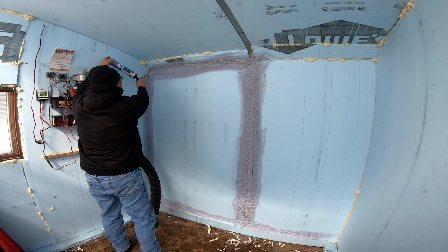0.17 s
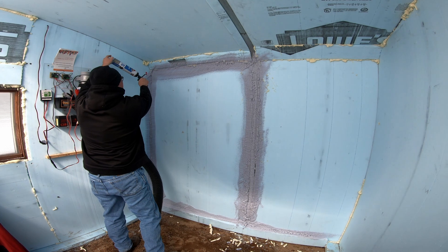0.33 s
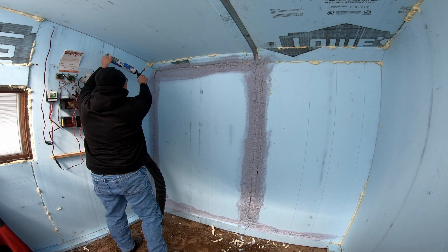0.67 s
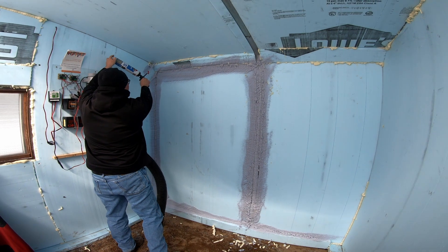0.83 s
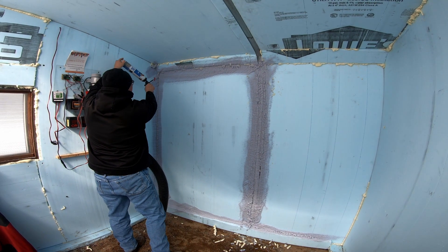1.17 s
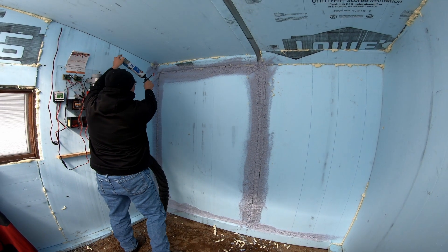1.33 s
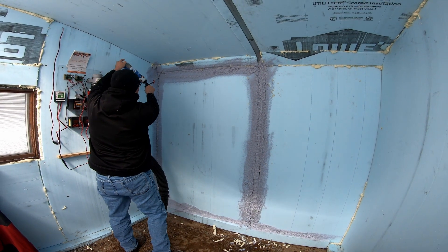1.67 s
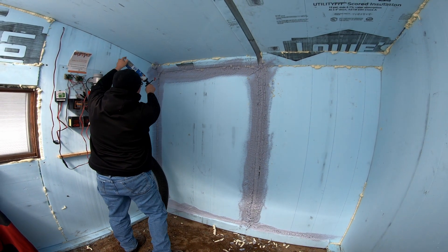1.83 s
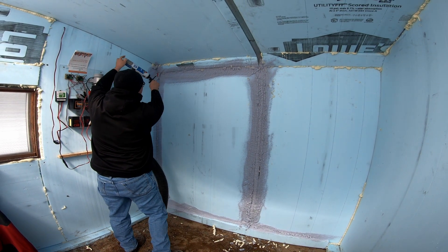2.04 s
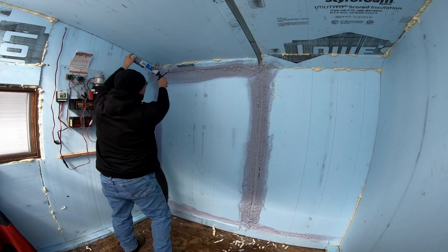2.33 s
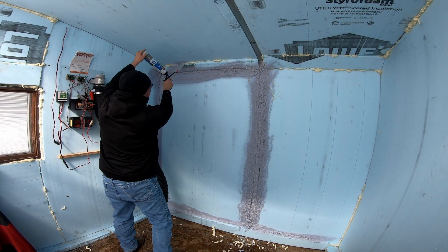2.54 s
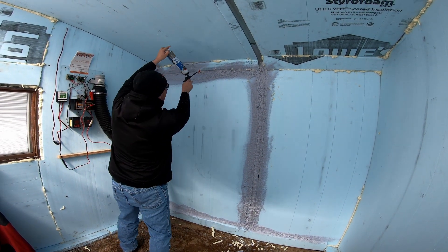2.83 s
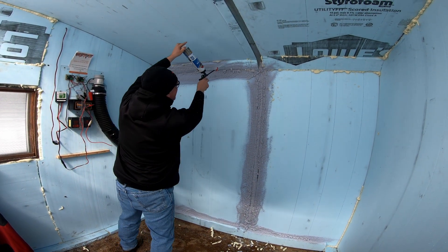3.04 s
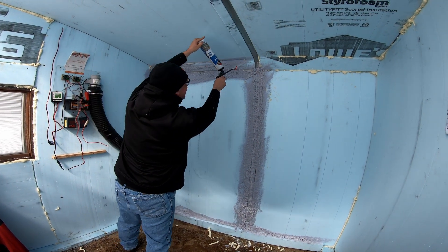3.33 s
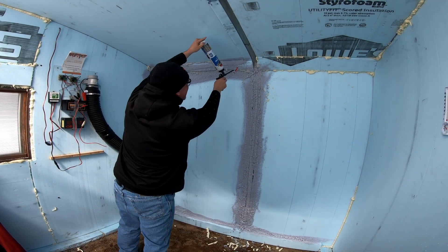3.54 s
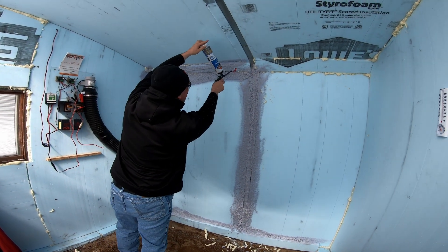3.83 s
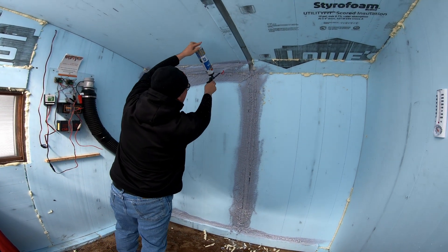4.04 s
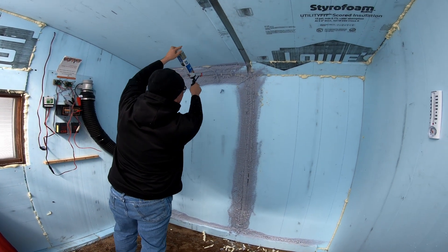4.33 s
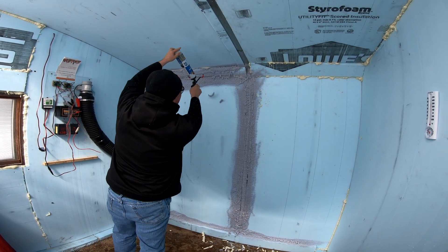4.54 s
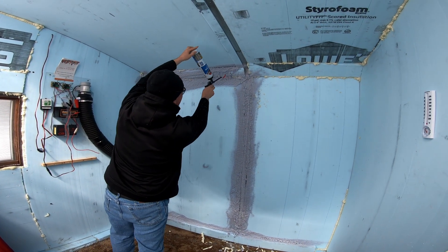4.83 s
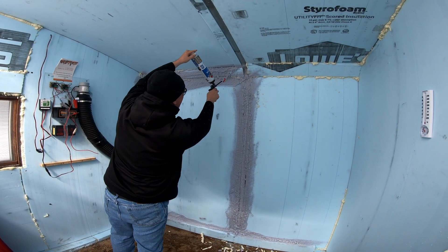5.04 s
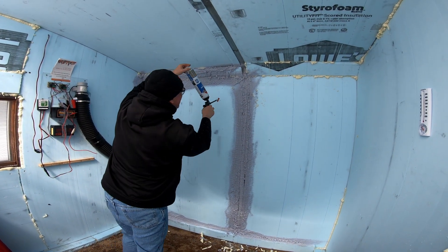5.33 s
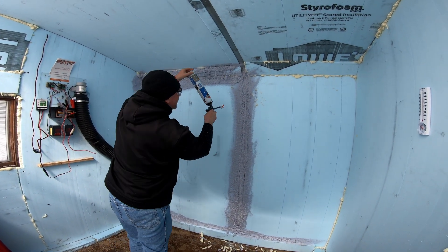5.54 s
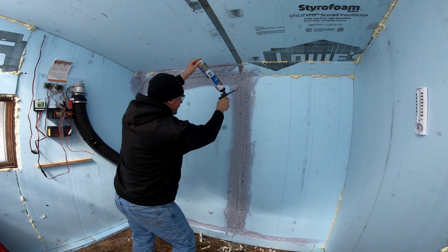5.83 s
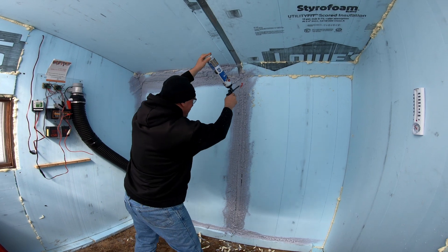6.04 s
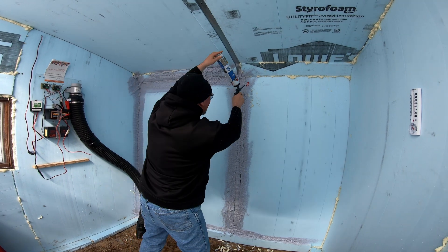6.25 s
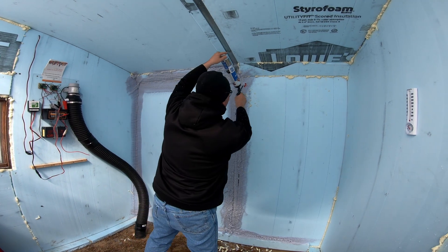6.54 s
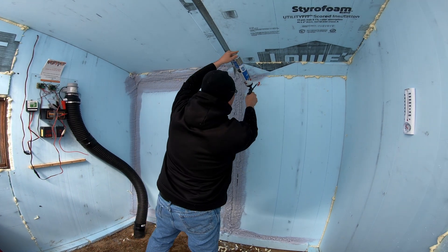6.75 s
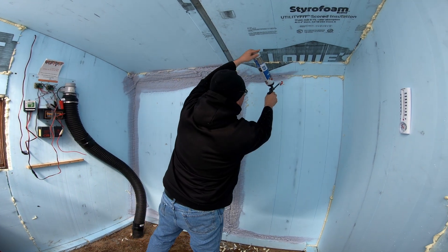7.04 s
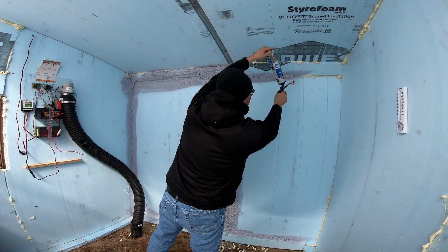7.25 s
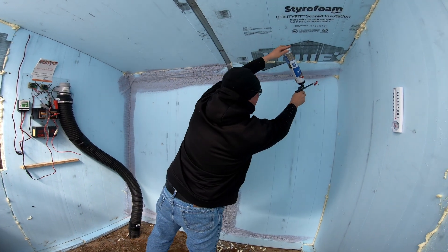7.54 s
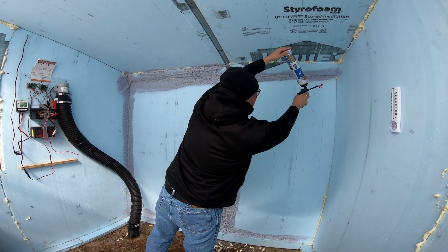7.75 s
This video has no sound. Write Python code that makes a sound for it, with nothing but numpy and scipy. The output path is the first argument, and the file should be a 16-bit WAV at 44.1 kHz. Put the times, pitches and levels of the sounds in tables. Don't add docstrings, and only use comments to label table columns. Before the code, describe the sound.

A spray-foam gun is already hissing at the start and shuts off around 0.3 seconds, leaving faint jacket rubs and weight shifts over very quiet room tone. Short, sharp squirts follow at 0.8 and 1.5. From about 2.3 to 3.5 a long, bright, turbulent hiss splashes against the panel, with a low rumble and hollow board resonance beneath. A quick step and scuff land at 3.7, then a medium burst at 3.9 to 4.4 and a short squirt at 4.65. Between 5.5 and 6.3 boots thud, slap and scrape on a gritty wooden floor, with crisp jacket rustle. A final long burst begins near 6.5, its hiss colour shifting as the nozzle moves near wall and ceiling, and chokes off around 7.8. The room is small with short reverberation; the stereo pickup is close.

```python
import sys
import numpy as np
from scipy import signal
from scipy.fft import rfft, irfft, next_fast_len
from scipy.io import wavfile
from scipy.ndimage import uniform_filter1d

SR = 44100
rng = np.random.default_rng(int(sys.argv[2]) if len(sys.argv) > 2 else 0)


def generate_wav(signal):
    frames = np.transpose(np.atleast_2d(signal))
    scaled = np.clip(frames, -1, 1) * 32767
    pcm = np.round(scaled).astype(np.int16)
    wavfile.write(sys.argv[1], SR, pcm)


def volts_from_db(level):
    exponent = np.asarray(level, float) / 20
    return 10 ** exponent


N = 347949

# f/Hz, level/dB (per Hz)
JET_SPECTRUM = [(900, -31), (1250, -13.5), (1600, -8), (2130, -3.5), (2780, -3.5), (3600, -4), (4520, -5),
                (5670, -5.5), (7350, -1.5), (8100, -4.5), (10300, -7), (11300, -14.5), (13700, -19),
                (15800, -29.5)]
SPLASH_SPECTRUM = [(350, -40.5), (600, -5.5), (800, -2), (1000, -1), (1300, 0), (1700, -2.5), (2400, -25)]
RUMBLE_SPECTRUM = [(90, -41), (125, -1.5), (170, 2), (221, 3.5), (300, -4), (400, -7), (600, -9),
                   (840, -43.5)]
BOOM_SPECTRUM = [(15, -45), (30, -28), (55, -20.5), (70, -16), (86, 7.5), (105, 0), (140, -32)]
AIR_SPECTRUM = [(15, -45.5), (30, -22), (60, -24), (110, -25.5), (165, -7), (286, -17), (450, -20),
                (620, -23.5), (780, -14.5), (1000, -26), (1400, -27.5), (2500, -35), (8000, -43),
                (15000, -57)]
CLOTH_SPECTRUM = [(350, -39), (650, -7.5), (1330, 0.5), (1760, -1.5), (2540, -5.5), (4200, -7), (6000, -14),
                  (9000, -25), (15000, -56)]
NYLON_SPECTRUM = [(2500, -30.5), (4500, -9), (7200, 1.5), (8800, -3.5), (10500, -7), (11500, -16.5),
                  (15000, -27)]
GRIT_SPECTRUM = [(1200, -12.5), (2500, 4), (4200, 4.5), (6000, -4.5), (10000, -8), (11500, -20),
                 (15000, -23)]

# f/Hz, likeness (-1 to 1)
JET_ALIKE = [(60, 0.97), (290, .97), (640, .7), (1410, 0.53), (3100, .8), (6820, 0.16), (15000, .0)]
ROOM_ALIKE = [(60, 0.79), (290, 0.7), (640, 0.83), (1410, 0), (3100, 0.68), (6820, .0)]
AIR_ALIKE = [(60, .4), (130, -0.3), (290, 0.5), (640, -0.18), (1410, -0.62), (3100, -0.021), (6820, .0)]
# f/Hz, level/dB
PORT_LEAN = [(60, 0), (150, -1.0), (380, -1), (950, -1), (2380, -1), (5980, -2.5), (15000, 3)]

# valve cracks t/s, first leak level/dB (re full jet), gas alone t/s,
# froth fills the jet t/s, held t/s
PULLS = [
    (-.3, -18, .04, 0.055, 0.22),
    (0.769, -17, 0.046, 0.051, 0.16),
    (1.475, -19, 0.029, .055, 0.12),
    (2.316, -19, 0.07, .15, .92),
    (3.894, -19, 0.044, 0.055, 0.4),
    (4.642, -22.5, 0.031, 0.058, 0.16),
    (6.53, -13.5, 0.088, 0.065, 1.069),
]
# jet level/dB; splash, panel rumble, room boom level/dB (re jet)
AIM = [(-25.5, -11, -18.5, -34.5), (-23, -13.5, -14, -21), (-23.5, -11, -16, -22.5),
       (-24, -11, -14.5, -26.5), (-23, -13, -15.5, -30.5), (-23.5, -11.5, -15.5, -30.5),
       (-22.5, -12, -16, -19.5)]
PANEL_MODE_DB = [-3.5, -5, -0.5, 10, 10.5, 9.5, -4.5]
# t/s, extra path off the near wall/ms, wall strength (0-1),
# round trip to the ceiling/ms, share kept per bounce (0-1)
NOZZLE = [(.8, 1.98, 0.1, .38, 0.26), (1.1, 2.1, .4, .39, 0.43), (1.5, 1.1, 0, 0.26, .2),
          (1.8, 1.1, 0.1, .28, .2), (2.4, 2.64, .06, 0.27, 0.3), (3, 2, .08, .37, 0.4),
          (3.5, 1.1, 0, 0.37, .08), (4.05, 1.12, .02, 0.27, 0.3), (4.2, 0.78, 0.1, .36, 0.1),
          (4.6, 1.7, 0.1, 0.38, 0.3), (5, 1.6, 0.3, .33, .3), (6.6, 1.13, 0.1, .37, 0.17),
          (6.85, .98, 0.3, 0.38, 0.48), (7.08, .76, 0.4, 0.3, 0.2), (7.27, .63, .65, .36, 0.12),
          (7.49, .47, 0.2, .36, .03), (7.64, 0.26, 0.1, .355, 0.8), (7.8, .18, .1, .32, 0.47)]
# delay/ms, strength (0-1)
CORNER = [(1.382, 0), (2.5, 0.07), (3.1, 0)]
# f/Hz, t60/s
ROOM_T60 = [(100, 0.46), (260, 0.17), (700, .27), (1840, 0.23), (4850, 0.21), (12800, .17)]

# t/s, rise/s, length/s, scrape level/dB, crisp nylon level/dB (re scrape)
RUBS = [(.33, .03, .05, -73, -22), (0.551, .012, .02, -67.5, -9), (0.749, .02, .03, -76, -25),
        (1.295, .02, .02, -82, -11), (2.128, .03, .1, -73.5, -16), (3.65, 0.022, .05, -69.5, -1),
        (3.703, .012, 0.028, -52.5, -8.5), (3.792, .02, .1, -69, -8), (5.261, .025, .23, -67.5, -2.5),
        (5.508, 0.0046, 0.034, -68, -6), (5.55, .008, 0.037, -51.5, -4.5),
        (5.598, 0.018, .11, -55.5, -12.5), (5.711, .017, 0.014, -45, -6.5), (5.76, .01, .06, -60, -13),
        (5.891, .02, .15, -69, -7.5), (6.068, 0.007, .03, -57, -8), (6.075, 0.02, 0.075, -53.5, -5),
        (6.2, 0.01, .06, -59.5, -4.5), (6.293, .008, 0.013, -63.5, -1.5), (6.33, .02, 0.072, -69, -7),
        (6.396, 0.014, .16, -63, 2.5)]
# t/s, murmur level/dB
SHIFTS = [
    (.21, -63),
    (.49, -59),
    (.555, -61),
    (.635, -55),
    (1.24, -63),
    (1.3, -64),
    (5.66, -46),
    (6.045, -49),
]
# t/s, thud level/dB, sole slap level/dB (re thud), grit level/dB (re thud), slap f/Hz
STEPS = [(3.709, -41, -4, -18, 1650), (3.761, -48.5, -16, -13.5, 1310), (5.508, -68.5, -10, 14, 720),
         (5.548, -44, -2.5, -16, 1120), (5.619, -45.5, -19, -3, 937), (5.726, -33, -4.5, -16, 870),
         (5.739, -32.5, -8, -35, 719), (5.82, -44, -3, -17, 607), (6.059, -35, -24.5, -22, 880),
         (6.1, -42, -13, -27, 1380), (6.21, -29, -32, -35, 757), (6.299, -56, -33, -12, 821)]
# t/s, level/dB
JOISTS = [
    (3.706, -54.5),
    (5.552, -65),
    (5.618, -53),
    (5.726, -61),
    (6.062, -58),
    (6.099, -60),
    (6.212, -57),
]
# f/Hz, width/Hz, level/dB
BOARDS = [(151, 20, -1.5), (210, 30, 4.5), (254, 45, 0.5), (320, 100, -9.5), (418, 55, -11)]
# pitch ratio, width ratio, level/dB
SOLE = [(1, 0.092, 5), (0.49, 0.67, -6.5), (1.4, 0.53, -8), (2.1, 0.47, -2.5), (2.3, 0.13, -4.5)]

CRACK_S = 0.027
SHUT_S, SHUT_DB = 0.054, 17
LEAK_GAIN_DB = 5
LEAK_SPLASH, LEAK_RUMBLE, LEAK_BOOM = 0.15, 0.92, 1.6
DRIBBLE = 0.35
DRY_DB, PLOP_DB, PLOP_S = -3.5, 13.5, 0.007
BOOM_LATE_DB, BOOM_BUILD_S = -13.5, 0.066
CLOSE_WALL_DB = 5
PANEL_HZ, PANEL_WIDTH_HZ = 412, 22
AIR_DB = -67.5
STILL_DB, STILL_CRISP_DB, STILL_MURMUR_DB = -88, -98, -77
RUB_SAG_DB_S, CRISP_SAG_DB_S, RUB_FALL_DB_S = 20.5, 45, 242.5
MURMUR_DB, MURMUR_FALL_DB_S = -5, 188.5
TOP_HZ = 15830


def unit(x):
    return x / np.sqrt(np.mean(x ** 2) + 1e-20)


def along(points, hz):
    f, v = np.transpose(points)
    return np.interp(np.log(hz + 1), np.log(f + 1), v)


def curves(rows):
    s, *columns = np.transpose(rows)
    return [np.interp(np.arange(N) / SR, s, column) for column in columns]


def wobble(rate):
    count = int(N * rate / SR) + 2
    return np.interp(np.arange(N) * rate / SR, np.arange(count), rng.standard_normal(count))


def noise_pair():
    return rng.standard_normal((2, N))


def filtered(x, response):
    m = next_fast_len(x.shape[-1] + SR // 2)
    hz = np.fft.rfftfreq(m, 1 / SR)
    return irfft(rfft(x, m) * response(hz), m)[..., :x.shape[-1]]


def coloured(pair, spectrum):
    return unit(filtered(pair, lambda hz: volts_from_db(along(spectrum, hz))))


def modes(table):
    def response(f):
        total = 0
        for k, (centre, width, db) in enumerate(table):
            damping = 1j * f * width
            total = total + (-1) ** k * volts_from_db(db) * damping / (centre * centre - f * f + damping)
        return total
    return response


def stereo(pair, alike):
    def turn(hz):
        angle = np.arccos(np.clip(along(alike, hz), -1, 1)) / 2
        return np.array([np.cos(angle), np.sin(angle)])
    mid, side = filtered(pair, turn)
    return np.array([mid + side, mid - side])


def delayed(x, ms):
    return np.interp(np.arange(N) - ms * SR / 1000, np.arange(N), x)


def lingering(db, t60):
    keep = np.exp(-np.log(1e6) / (t60 * SR))
    power = volts_from_db(2 * db)
    return np.sqrt(signal.lfilter([1 - keep], [1, -keep], power, zi=keep * power[:1])[0])


def trigger():
    t = np.arange(N) / SR
    pull = np.searchsorted([p[0] for p in PULLS], t) - 1
    s, leak_db, gas, fill, held = np.transpose(PULLS)[:, pull]
    full_db, splash, rumble, boom = np.transpose(AIM)[:, pull]
    landed = t - s - gas

    leak = volts_from_db(leak_db + LEAK_GAIN_DB * np.clip((t - s) / gas, 0, 1))
    leak = leak * np.clip((t - s) / CRACK_S, 1e-3, 1) ** 2.2
    froth = np.sin(np.pi / 2 * np.clip(landed / fill, 0, 1)) ** 2
    opening = 20 * np.log10(leak + (1 - leak) * froth)
    shutting = -SHUT_DB * (np.maximum(landed - fill - held, 0) / SHUT_S) ** 1.5
    jet_db = np.maximum(full_db + opening + shutting, -110)

    plop = PLOP_DB * np.exp(-np.abs(landed) / PLOP_S)
    foam = np.where(landed < 0, DRY_DB, plop)
    dribble = np.minimum(-DRIBBLE * shutting, 6)
    splash_db = splash + foam + LEAK_SPLASH * opening + dribble
    rumble_db = rumble + LEAK_RUMBLE * opening
    loading = BOOM_LATE_DB * np.exp(-np.maximum(landed, 0) / BOOM_BUILD_S)
    boom_db = boom + LEAK_BOOM * opening + loading
    return jet_db, splash_db, rumble_db, np.take(PANEL_MODE_DB, pull), boom_db


def rush(spectrum, patchy_db):
    z = signal.stft(noise_pair(), nperseg=512)[2]
    field = uniform_filter1d(rng.standard_normal(z.shape[1:]), size=3, axis=0)
    field = uniform_filter1d(field, size=24, axis=1)
    patchy = signal.istft(z * volts_from_db(patchy_db * unit(field)), nperseg=512)[1][:, :N]
    return coloured(patchy, spectrum)


def early_echoes(hiss, ms, strength, trip_ms, kept):
    soft = filtered(hiss, lambda hz: 1 / (1 + (hz / 4000) ** 3))
    sway = 1 + 0.059 * wobble(2.5)
    echoes = strength * delayed(soft, ms)
    for bounce in range(1, 5):
        echoes = echoes + kept ** bounce * delayed(soft, bounce * trip_ms)
    for delay_ms, gain in CORNER:
        echoes = echoes + gain * delayed(soft, delay_ms * sway)
    return echoes


def gun():
    jet_db, splash_db, rumble_db, panel_db, boom_db = trigger()
    ms, strength, trip_ms, kept = curves(NOZZLE)

    sputter = volts_from_db(1.5 * wobble(400) + 0.21 * wobble(60) + 0.45 * wobble(12))
    jet = unit(sputter * rush(JET_SPECTRUM, patchy_db=1.77))
    spatter = unit(sputter * volts_from_db(0.94 * wobble(90)) * coloured(noise_pair(), SPLASH_SPECTRUM))
    splash = volts_from_db(splash_db - 1.2 + CLOSE_WALL_DB * strength) * spatter
    hiss = volts_from_db(jet_db + 0.5) * (jet + splash)
    echoes = early_echoes(hiss[0], ms, strength, trip_ms, kept)

    rumble_gain = lingering(jet_db + rumble_db + 0.98 * wobble(20), t60=0.21)
    rumble = rumble_gain * coloured(noise_pair(), RUMBLE_SPECTRUM)
    boom_gain = lingering(jet_db + boom_db + 3.3 * wobble(18), t60=0.14)
    boom = boom_gain * coloured(noise_pair(), BOOM_SPECTRUM)
    mode = filtered(volts_from_db(panel_db) * rumble, modes([(PANEL_HZ, PANEL_WIDTH_HZ, 0)]))
    return hiss + echoes * [[1], [0]], rumble + boom + mode


def room(x):
    hop = SR // 2
    out = np.zeros((2, N + 3 * SR))
    fade = np.sin(np.pi * np.arange(2 * hop) / (2 * hop))
    x = np.pad(x, (hop + 180, 2 * hop))
    for k in range(0, N + hop, hop):
        hz, t, z = signal.stft(rng.standard_normal((2, SR // 2)), SR, nperseg=256)
        decay = volts_from_db(-60 * t / along(ROOM_T60, hz)[:, None])
        tail = signal.istft(z * decay, SR, nperseg=256)[1]
        tail = tail / np.linalg.norm(tail[0])
        part = signal.fftconvolve((fade * x[k:k + 2 * hop])[None], tail, axes=1)
        out[:, k:k + part.shape[1]] += part
    return stereo(out[:, hop:hop + N], ROOM_ALIKE)


def room_tone():
    level = volts_from_db(AIR_DB + 2 + 0.57 * wobble(3.6))
    return level * stereo(coloured(noise_pair(), AIR_SPECTRUM), AIR_ALIKE)


def stroke(s, length, db, rise, sag, fall):
    t = np.arange(N) / SR - s
    lost_db = sag * np.clip(t, 0, length) + fall * np.maximum(t - length, 0)
    return np.clip(t / rise, 0, 1) ** 4 * volts_from_db(2 * (db - lost_db))


def moves():
    clumps = volts_from_db(1.4 * wobble(88) + 2.5 * wobble(620))
    cloth = unit(clumps * coloured(noise_pair(), CLOTH_SPECTRUM))
    nylon = unit(clumps * coloured(noise_pair(), NYLON_SPECTRUM))
    boards = unit(filtered(noise_pair(), lambda hz: modes(BOARDS)(hz) / (1 + (120 / (hz + 1)) ** 4)))

    scrape, crisp, murmur = np.zeros((3, N))
    for s, rise, length, db, crisp_db in RUBS:
        scrape += stroke(s, length, db, rise, RUB_SAG_DB_S, RUB_FALL_DB_S)
        crisp += stroke(s, length, db + crisp_db, rise, CRISP_SAG_DB_S, RUB_FALL_DB_S)
    loads = [*SHIFTS, *[(s, db + MURMUR_DB) for s, db, *_ in STEPS]]
    for s, db in loads:
        murmur += stroke(s, 0, db, 0.016, 0, MURMUR_FALL_DB_S)

    fidget = wobble(14)
    scrape += volts_from_db(2 * (STILL_DB + 4 * fidget))
    crisp += volts_from_db(2 * (STILL_CRISP_DB + 3 * fidget))
    murmur += volts_from_db(6 * (STILL_MURMUR_DB + 5 * wobble(12)))
    rubbing = volts_from_db(-2.5) * np.sqrt(scrape) * cloth + volts_from_db(-0.5) * np.sqrt(crisp) * nylon
    return rubbing + volts_from_db(-4.5) * np.sqrt(murmur) * boards


def boots():
    push, direct, grit = np.zeros((3, N + SR))
    t = np.arange(SR // 8) / SR
    noises = rng.standard_normal((len(STEPS), 3, len(t)))
    for (s, db, slap_db, grit_db, hz), noise in zip(STEPS, noises):
        k = slice(round(s * SR), round(s * SR) + len(t))
        thud = t / 0.0013 * np.exp(-t / 0.0013) * 6
        push[k] += volts_from_db(db + 5.5) * (thud + 0.23 * noise[0] * np.exp(-t / 0.017))

        slap = volts_from_db(db + slap_db + 15) * noise[1] * np.exp(-t / 0.014) * (1 - np.exp(-t / 0.0023))
        sole = modes([(hz * ratio, hz * width, level) for ratio, width, level in SOLE])
        direct[k] += filtered(slap, lambda f: sole(f) / (1 + 1j * f / 3000) ** 2)

        grit[k] += volts_from_db(db + grit_db) * noise[2] * np.exp(-t / 0.011) * (1 - np.exp(-t / 0.0017))
    for s, db in JOISTS:
        give = np.sin(2 * np.pi * 72 * t) * np.exp(-t / 0.02)
        direct[round(s * SR):][:len(t)] += volts_from_db(db + 7.5) * give
    floor = filtered(push, lambda hz: modes(BOARDS)(hz) / (1 + 1j * hz / 600) ** 2)
    crunch = filtered(grit, lambda hz: volts_from_db(along(GRIT_SPECTRUM, hz)))
    return (direct + floor + crunch)[:N]


def scene():
    spray, panel = gun()
    feet = boots()
    body = moves()
    wet = room(volts_from_db(-6.0) * spray[0] + feet)
    return stereo(spray + panel, JET_ALIKE) + feet + stereo(body, ROOM_ALIKE) + wet + room_tone()


def top_cut(x):
    return signal.sosfilt(signal.butter(12, 15950, fs=SR, output="sos"), x)


def record(dry):
    side = np.array([[0.5], [-0.5]])
    ports = filtered(dry, lambda hz: (hz < TOP_HZ) * volts_from_db(side * along(PORT_LEAN, hz)))
    return top_cut(ports)


dry = scene()
out = record(dry)
generate_wav(out)
```